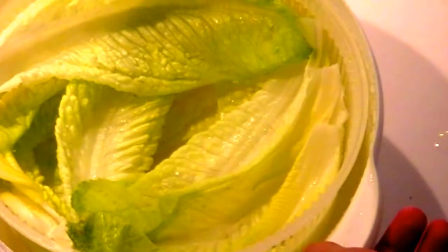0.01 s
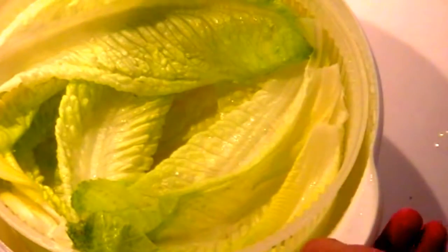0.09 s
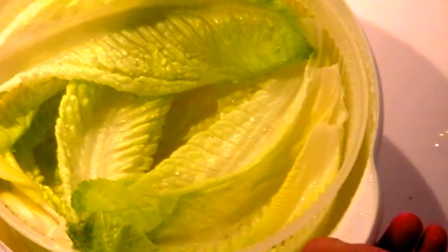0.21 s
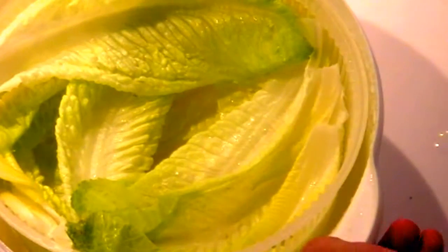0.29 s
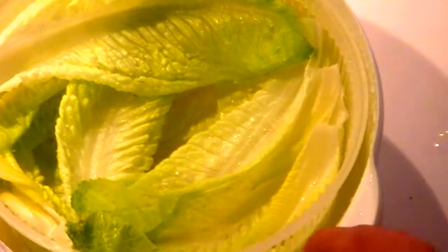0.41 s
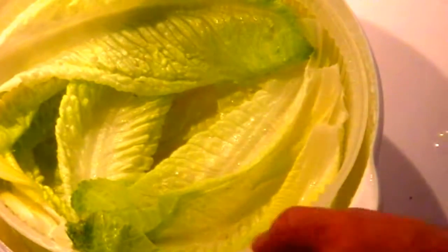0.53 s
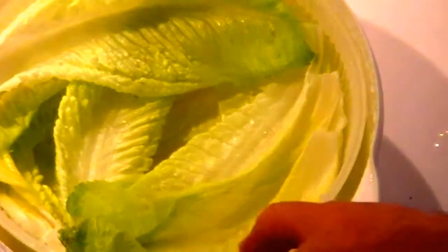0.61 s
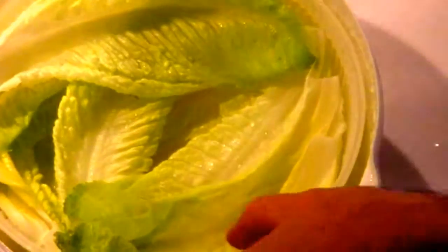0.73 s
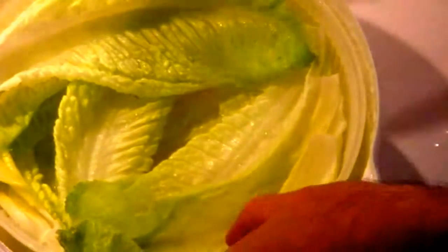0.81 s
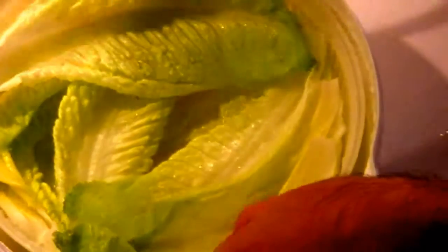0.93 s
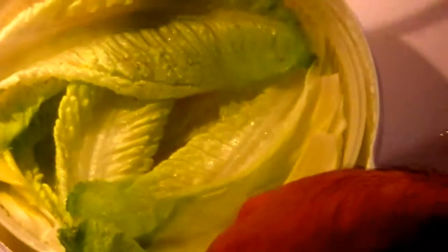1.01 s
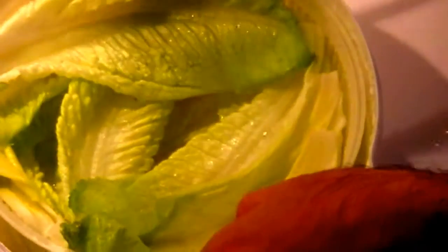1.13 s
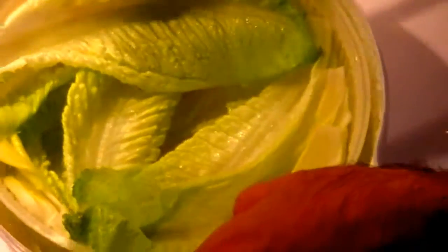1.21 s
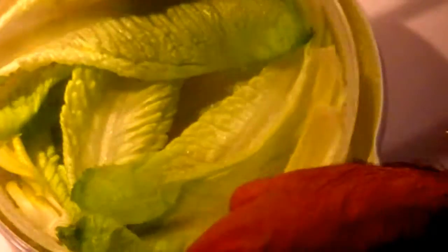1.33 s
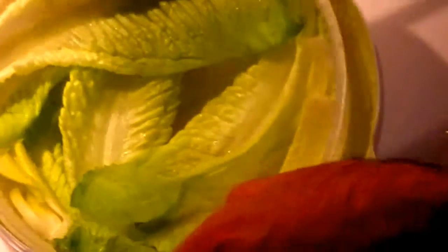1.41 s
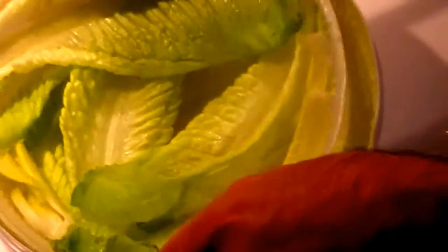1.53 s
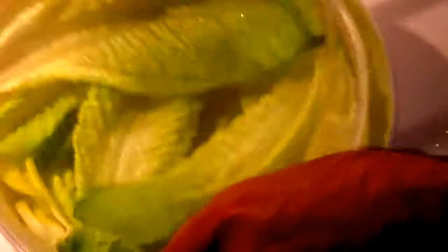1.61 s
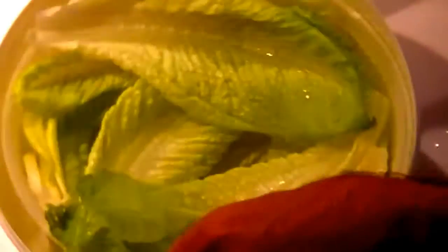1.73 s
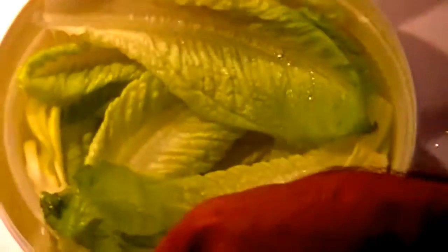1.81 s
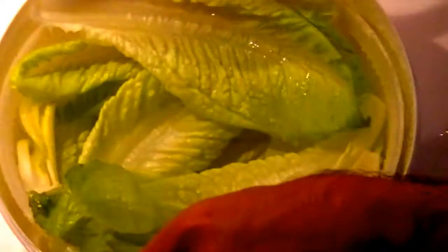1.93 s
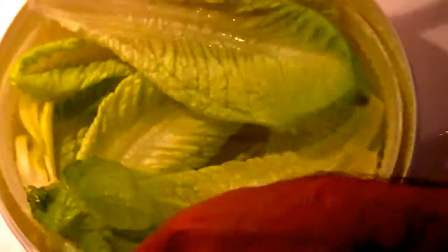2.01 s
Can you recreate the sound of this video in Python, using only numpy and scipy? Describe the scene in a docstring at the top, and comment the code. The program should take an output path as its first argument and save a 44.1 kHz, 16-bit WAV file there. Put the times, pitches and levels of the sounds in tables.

```python
"""Soft rubbing of a turning basket, then knocks: a plastic salad spinner full of lettuce, close to the
microphone in a small kitchen. The basket knocks against the bowl, more and more weakly as it slows, and
ticks; the bowl scuffs and bumps down with a hollow thud. Contacts are short coloured noise bursts, with a
snap of decaying modes for the thin plastic. Bowl modes and decaying room noise ring on after them."""
import sys
import numpy as np
from scipy import signal
from scipy.fft import rfft, irfft
from scipy.io import wavfile
from scipy.ndimage import uniform_filter1d

SR = 44100
rng = np.random.default_rng(int(sys.argv[2]) if len(sys.argv) > 2 else 0)


def to_wav(sig):
    """Store sig (one row per channel, or 1-D mono) as 16-bit WAV at the path in sys.argv[1].

    Samples outside -1..1 are clipped; the rate is SR.
    """
    pcm = np.clip(np.atleast_2d(sig), -1, 1) * 32767
    pcm = np.round(pcm).astype(np.int16)
    wavfile.write(sys.argv[1], SR, pcm.T)  # frames by channels


N = 90405  # length in samples

SIZE = 4096  # samples in a short burst or filter
T = np.arange(SIZE) / SR  # s
HZ = np.maximum(np.arange(SIZE // 2 + 1) * SR / SIZE, 1)  # frequency grid, kept above zero for the logs
TAIL = np.arange(6 * SIZE) / SR  # s, time axis of what rings on

# Colour of plastic on plastic, for knocks, ticks and scuffs. Each row: frequency in Hz, gain in dB.
PLASTIC_COLOUR = [(30, -42), (85, -11), (140, -36), (220, -4.5), (400, -6), (700, 6), (1200, 7),
                  (1600, 8.5), (2200, 10.5), (3800, 7), (5500, 0), (7600, 1), (10000, -8.5), (13000, -17),
                  (15500, -30)]


def undb(db):
    """Turn dB into an amplitude factor."""
    return 10 ** (np.asarray(db) / 20)


def curve(points, hz=HZ):
    """Read (Hz, value) points on a log-frequency axis."""
    f, v = np.array(points).T
    return np.interp(np.log(hz), np.log(f), v)


def convolve(x, response):
    """Pass a sound through a response, keeping its length."""
    return signal.oaconvolve(x, response)[:len(x)]


def colour(x, db):
    """Causal minimum-phase filter, made by folding the cepstrum of the gain at each frequency."""
    cepstrum = irfft(np.log(undb(db)))
    cepstrum[1:SIZE // 2] *= 2
    cepstrum[SIZE // 2 + 1:] = 0
    return convolve(x, irfft(np.exp(rfft(cepstrum))))


def even(x, size):
    """Flatten the spectrum over stretches of this many bins, leaving about unit energy."""
    power = uniform_filter1d(np.abs(rfft(x)) ** 2, size=size)
    power = power[::len(x) // SIZE]  # back onto the HZ grid
    return colour(x, -10 * np.log10(np.abs(power) + 1e-12))


def add(track, start_s, x):
    """Mix a sound in at its time, cut at the end of the track."""
    i = max(int(start_s * SR), 0)
    track[i:i + len(x)] += x[:max(N - i, 0)]


def ring(modes, t):
    """Sum of exponentially decaying modes; the dB of each give its energy, not its peak."""
    out = 0
    for hz, db, t60 in modes:
        unit_energy = 2 * np.sqrt(np.log(1000) / (t60 * SR))
        decay = np.exp(-np.log(1000) * t / t60)
        out = out + undb(db) * unit_energy * np.cos(2 * np.pi * hz * t) * decay
    return out


def burst(envelope):
    """A run of tiny contacts: noise under an envelope, with an evened spectrum."""
    return even(rng.standard_normal(SIZE) * envelope, size=19)


def treble(db):
    """Shelf that brightens a harder contact, reaching half its dB at the turnover."""
    turnover_hz = 4640
    return db * HZ ** 4 / (HZ ** 4 + turnover_hz ** 4)


def hump(hz, octaves):
    """Shape of a broad resonance: 1 at its centre, half at this many octaves away."""
    return 1 / (1 + (np.log2(HZ / hz) / octaves) ** 2)


def background():
    """Grainy rubbing of the basket, as noise of stepped random level, over the kitchen's steady murmur of air."""
    # How loud the rubbing is. Each row: time in seconds, level in dB.
    rubbing_level = [(0, -61.5), (.2, -64), (0.898, -51), (1.2, -52), (1.33, -56), (1.4, -56), (1.52, -61),
                     (1.558, -59), (1.948, -59), (2.0, -55), (2.05, -53.5)]
    # Colour of the rubbing. Each row: frequency in Hz, gain in dB.
    rub_colour = [(60, -53.5), (200, -17), (320, -11.5), (600, 3), (950, -10), (1400, -3.5), (2200, -6),
                  (4500, -20.5), (7500, -14), (10000, -27.5), (15000, -35)]
    # Colour of the air in the kitchen. Each row: frequency in Hz, gain in dB.
    air_colour = [(30, -44), (100, -20), (200, -12.5), (310, -4), (450, -7), (1000, 0), (1500, -10),
                  (3000, -22), (7500, -28.5), (11000, -31.5), (15500, -51)]
    grain_db, air_db = 1.5, -54  # spread of the grain levels; level of the air
    grains = np.repeat(rng.standard_normal(N), 64)[:N]  # each grain holds for 64 samples
    rub = colour(rng.standard_normal(N) * undb(grain_db * grains), curve(rub_colour))
    air = colour(rng.standard_normal(N), curve(air_colour))
    rub_db = np.interp(np.arange(N) / SR, *np.array(rubbing_level).T)
    return rub / rub.std() * undb(rub_db) + air / air.std() * undb(air_db)


def kitchen():
    """Dense echoes of a small hard room: noise that dies away band by band."""
    # How long the room rings. Each row: frequency in Hz, 60 dB decay time in seconds.
    room_t60 = [(150, 0.33), (400, 0.26), (1000, 0.47), (2800, 0.5), (7300, 0.45), (14000, 0.24)]
    # How strongly the room answers. Each row: frequency in Hz, level in dB against the sound sent into it.
    room_level = [(100, -1.5), (400, 2.5), (900, 5), (2000, 1.5), (4000, -0.5), (8000, -2), (14000, -9)]
    build_s = 0.002
    noise = rfft(rng.standard_normal(len(TAIL)))
    hz = np.fft.rfftfreq(len(TAIL), 1 / SR)
    edges = np.r_[0, np.geomspace(200, SR / 2, 9)]  # Hz
    echoes = 0
    for lo, hi in zip(edges, edges[1:]):
        band = irfft(noise * ((hz >= lo) & (hz < hi)))
        t60 = curve(room_t60, (lo + hi) / 2)
        echoes = echoes + band * np.exp(-np.log(1000) * TAIL / t60)
    build_up = 1 - np.exp(-(TAIL / build_s) ** 2)
    return colour(even(echoes * build_up, size=24), curve(room_level))


def bowl_modes():
    """The bowl ringing on at its own modes after a contact."""
    # Modes of the bowl. Each row: frequency in Hz, energy in dB, 60 dB decay time in seconds.
    modes = [(316.3, -21, 0.41), (467.4, -21, 0.18), (825, -21.5, 0.61), (880, -15.5, 0.39),
             (1020, -26, 0.27), (1081, -23.5, 0.88), (1215, -20.5, 0.34), (1296, -17.5, 0.29),
             (1403, -22.5, 0.27), (1827, -21.5, 0.42), (1883, -24.5, .36), (2237, -21, 0.36),
             (2353, -55, 1), (2510, -38.5, 0.58)]
    return ring(modes, TAIL)


def bowl_bump():
    """The bowl shifts: scuffs of decaying plastic-coloured noise, and shorter, hollow-coloured thuds."""
    # Scuffs of the bowl. Each row: start in seconds, level in dB, decay constant in seconds, treble in dB.
    scuffs = [(1.619, -26, 0.036, 19), (1.632, -15.5, 0.033, 4.5), (1.653, -6.5, 0.022, 0.5),
              (1.669, -8.5, 0.03, 5), (2.022, -21.5, 0.028, -9)]
    # Thuds of the bowl. Each row: start in seconds, level in dB.
    thuds = [(1.318, -19), (1.328, -22), (1.6692, 5.5), (1.679, 3), (1.687, -3)]
    # Hollow colour of a thud. Each row: frequency in Hz, gain in dB.
    thud_colour = [(40, -22), (150, -17), (260, 4.5), (370, -1.5), (465, 12), (620, -1), (780, 13),
                   (900, 16.5), (1000, 13.5), (1200, -8), (1580, 12), (2000, -8), (4500, -24.5),
                   (14000, -39)]
    thud_decay_s = 0.0032
    out = np.zeros(N)
    for start, db, decay_s, treble_db in scuffs:
        scuff = burst(np.exp(-T / decay_s))
        add(out, start, colour(scuff, curve(PLASTIC_COLOUR) + db + treble(treble_db)))
    for start, db in thuds:
        thud = burst(np.exp(-T / thud_decay_s))
        add(out, start, colour(thud, curve(thud_colour) + db))
    return out


def contact(tone_db, snap_db):
    """Plastic meets plastic: a touch, then a chattering blow that snaps the rim; direct and ringing-on sound."""
    # Snap of the rim. Each row: frequency in Hz, energy in dB, 60 dB decay time in seconds.
    snap_modes = [(2063, -2.5, 0.018), (2913, 0.5, .012), (3340, -10, 0.021)]
    blow_lag_s, touch_db, chatter_s = 0.0023, -8, 0.0035
    snap_rise_s, snap_ring_db = 0.0003, -10.5  # the snap's onset; how much of it rings on
    since_blow = np.maximum(T - blow_lag_s, 0)
    envelope = np.where(since_blow > 0, np.exp(-since_blow / chatter_s), undb(touch_db))
    chatter = colour(burst(envelope), curve(PLASTIC_COLOUR) + tone_db)
    onset = 1 - np.exp(-(since_blow / snap_rise_s) ** 2)
    snap = undb(snap_db) * ring(snap_modes, since_blow) * onset
    return chatter + snap, chatter + undb(snap_ring_db) * snap


def basket():
    """Knocks, each waking the wall and body resonances where it lands, and ticks; direct and ringing-on sound."""
    # Knocks of the basket. Each row: start in seconds, level in dB, wall resonance in Hz, its width in
    # octaves, its lift in dB, body resonance in Hz, its lift in dB, clatter lift in dB, treble in dB,
    # snap level in dB, ring-on level in dB.
    knocks = [(0.2294, 5.5, 1786, 0.13, 15, 329, 9.5, 6, 1, -46, -0.5),
              (.4070, 5, 1144, 0.41, 13.5, 276, 11.5, 5.5, 7, -0.5, -0.5),
              (.6110, 1.5, 1020, 0.19, 11, 220, 7.5, -5, 4, 8, 2),
              (.7400, -1.5, 716, 1, 9, 240, 4, -3, 3, 5, 2.5),
              (.7670, -3.5, 1350, 0.14, 9.5, 328, 1, 7.5, -0.5, -5, -4),
              (.8910, -6, 1080, 0.12, 11, 250, 9, -7, 3.5, 0.5, 1.5),
              (0.9421, -2, 1400, 0.16, 1.5, 223, 3, -2, -1.5, -4, 0),
              (.9610, -5, 970, 0.53, 2, 232, 3, -11, -2.5, -10, 5.5)]
    # Light ticks of the rim. Each row: start in seconds, level in dB, treble in dB, snap level in dB.
    ticks = [(1.0605, -14.5, -0.5, -10), (1.083, -19.5, 6.5, -38), (1.096, -25.5, 12.5, -37),
             (1.1211, -10, -10, -18), (1.239, -29, 7, -36), (1.4226, -13, -16.5, -13),
             (1.4576, -17.5, -11, -21.5), (1.486, -41, 12, -49), (1.7641, -20, -3, -19),
             (1.7888, -20.5, -6, -38), (1.994, -33.5, 8, -25.5)]
    body_octaves, clatter_hz, clatter_octaves = 0.13, 2490, 0.2
    tick_ring_db = -1.5  # how much of a tick rings on
    direct, ringing = np.zeros(N), np.zeros(N)
    for (start, db, wall_hz, wall_octaves, wall_db, body_hz, body_db,
         clatter_db, treble_db, snap_db, ring_db) in knocks:
        wall = wall_db * hump(wall_hz, wall_octaves)
        body = body_db * hump(body_hz, body_octaves)
        clatter = clatter_db * hump(clatter_hz, clatter_octaves)
        knock, rings = contact(db + wall + body + clatter + treble(treble_db), snap_db)
        add(direct, start, knock)
        add(ringing, start, undb(ring_db) * rings)
    for start, db, treble_db, snap_db in ticks:
        tick, rings = contact(db + treble(treble_db), snap_db)
        add(direct, start, tick)
        add(ringing, start, undb(tick_ring_db) * rings)
    return direct, ringing


def scene():
    """The spinner close to the microphone and its ringing in bowl and room, mostly centred."""
    # How much of the bump rings on. Each row: frequency in Hz, level in dB.
    bump_ring = [(250, -2), (470, -2), (850, -9), (1600, -7), (4000, -6)]
    # Stereo width. Each row: frequency in Hz, gain of the side signal in dB.
    width = [(60, -3), (150, -1), (250, -5.5), (600, -12), (2000, -11), (4500, -11.5), (6500, -9),
             (7600, -4.5), (9000, 1), (12000, -5.5)]
    direct, ringing = basket()
    bump = bowl_bump()
    direct = direct + bump
    ringing = ringing + colour(bump, curve(bump_ring))
    mid = direct + convolve(ringing, kitchen() + bowl_modes()) + background()
    # the side has its own draws of room and background, and a briefly smeared direct sound
    smear = burst(np.exp(-T / 0.00067))
    side = undb(-8) * convolve(direct, smear) + convolve(ringing, kitchen()) + background()
    return mid + colour(side, curve(width)) * np.array([[1], [-1]])


def record(dry):
    """The recorder rounds high peaks smoothly toward a ceiling, then cuts the top with a steep low-pass."""
    peak_ceiling, top_hz = 0.85, 15500
    held = dry / (1 + (dry / peak_ceiling) ** 4) ** 0.25
    low_pass = signal.ellip(8, 0.2, 80, top_hz, fs=SR, output="sos")
    return signal.sosfilt(low_pass, held)


dry = scene()
out = record(dry)
to_wav(out)
```